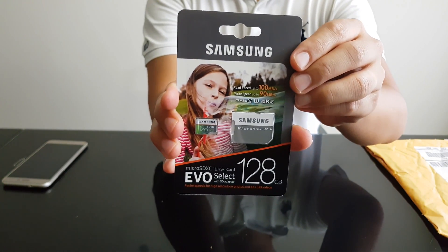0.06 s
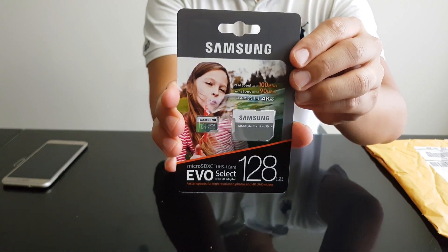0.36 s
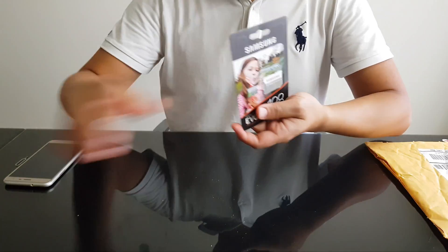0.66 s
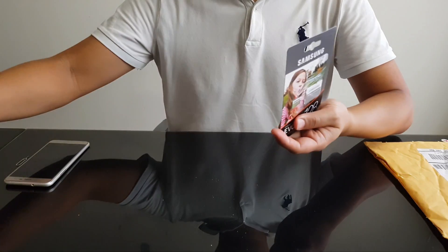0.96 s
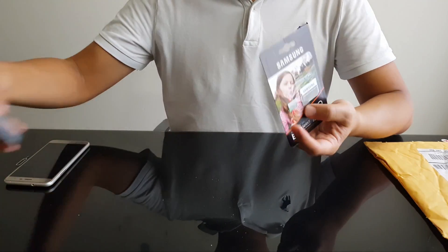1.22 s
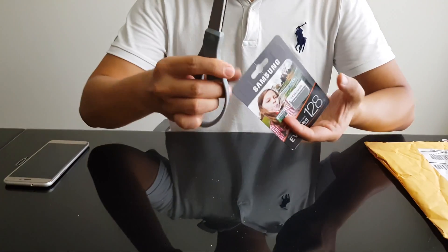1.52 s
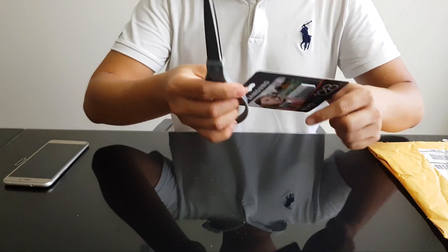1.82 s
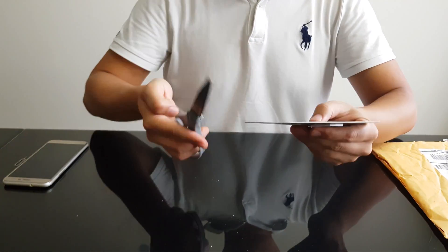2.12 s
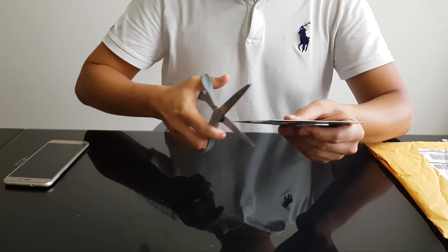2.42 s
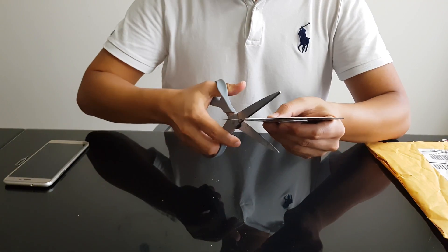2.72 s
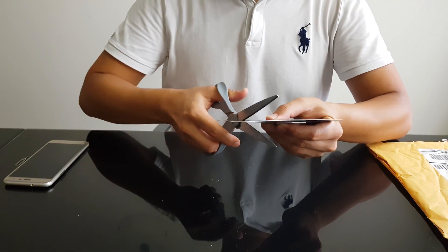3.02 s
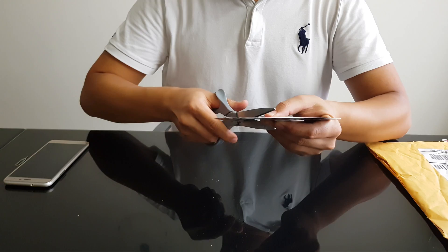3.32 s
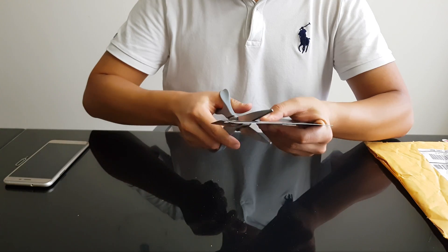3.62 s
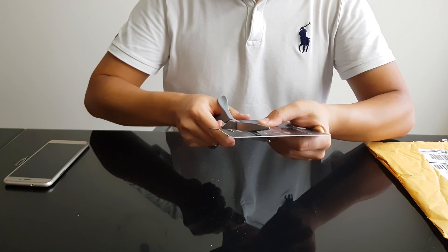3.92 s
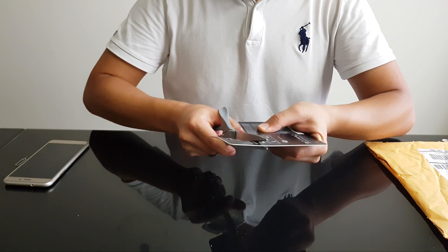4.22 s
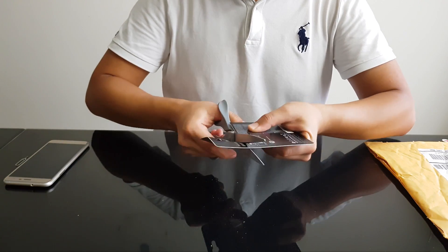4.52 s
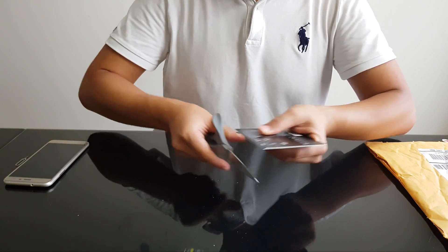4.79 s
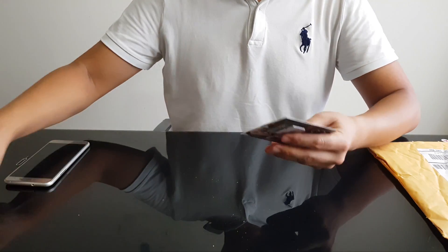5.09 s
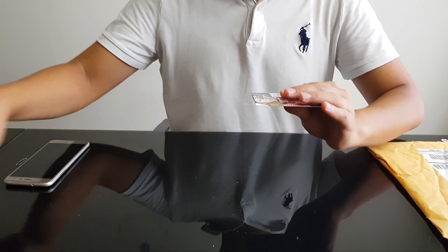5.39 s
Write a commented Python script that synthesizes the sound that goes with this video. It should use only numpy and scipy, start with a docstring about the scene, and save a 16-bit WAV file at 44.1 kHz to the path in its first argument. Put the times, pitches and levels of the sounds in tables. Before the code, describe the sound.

Scissors are lifted from a glass table, cut through a plastic blister pack with creaks and a snap, then clatter back down.

```python
"""Scissors are lifted from a glass table, whose modes ring from the knocks. A card-backed plastic blister
pack rubs and tocks in the hands, and the blades open with a swish of sliding friction. One long squeeze
drives them through the pack: it creaks by stick and slip, cracks, and yields with a snap. The pack
crackles as the blades are drawn free, and the scissors clatter back onto the glass. Throughout, a small,
bare room reverberates and rumbles, heard from a phone at the table's edge."""
import sys
import numpy as np
from scipy import signal
from scipy.fft import rfft, irfft, next_fast_len
from scipy.io import wavfile
from scipy.ndimage import uniform_filter1d

SR = 44100
rng = np.random.default_rng(int(sys.argv[2]) if len(sys.argv) > 2 else 0)


def unload_audio(sound):
    """Save the sound as a 16-bit wav file, at the path given as the first command line argument."""
    columns = np.transpose(np.atleast_2d(sound))
    # keep every value between -1 and 1, then stretch to whole-number steps
    steps = np.round(np.clip(columns, -1, 1) * 32767)
    wavfile.write(sys.argv[1], SR, steps.astype(np.int16))


N = 244755
TIME = np.arange(N) / SR

# Levels are relative within each source, and each source scales its contact times by its own stretch.
# effort of the squeeze that drives the blades through the pack: time_s, level_db
SQUEEZE_EFFORT = [(3.08, -87), (3.18, -63), (3.24, -66.5), (3.29, -64.5), (3.34, -65), (3.43, -59.5),
                  (3.6, -67), (3.75, -61), (3.8, -70), (3.87, -58.5), (4.05, -67.5), (4.2, -65)]
# card creaking where the blades wedge it: start_s, length_s, level_db
CARD_CREAKS = [(3.265, 0.036, -67.5), (3.385, 0.14, -72.5), (3.72, 0.032, -59.5)]
# resonances of the card and of the cutting edge: centre_hz, width_hz, gain_db
CARD_RESONANCES = [(810, 134, -1.5), (1860, 420, 2), (2200, 35, -16)]
EDGE_RESONANCES = [(4760, 1100, -2.5), (8500, 600, -1), (10500, 1600, -5)]

# impacts: start_s, contact_s, level_db, hardness_db
PLASTIC_CRACKS = [(3.364, 0.0037, -63, 5.5), (3.398, 0.0016, -63, 8), (3.443, 0.0025, -67, 6),
                  (3.5, 0.0021, -58, 10), (3.536, 0.005, -57, -0.5), (3.636, 0.0027, -53.5, 5.5),
                  (3.6483, 0.00099, -37.5, -8), (3.82, 0.0028, -58.5, -0.5), (3.835, 0.0017, -60, -9),
                  (3.875, 0.0019, -53, 7), (3.926, 0.0022, -52.5, 6), (3.955, 0.0038, -57.5, 5),
                  (4.0, 0.0017, -49, 3.5), (4.078, 0.0029, -58.5, 6.5), (4.129, 0.0022, -50, 1.5),
                  (4.358, 0.0082, -51, 2)]  # plastic breaking between the blades
BLADE_SNAP = [(4.3965, 0.0021, -18.5, -3.5)]  # the blades coming through and shutting
GLASS_KNOCKS = [(0.903, 0.0016, -26, 11), (0.914, 0.0067, -32, -8.5), (0.925, 0.0028, -40.5, -10.5),
                (0.941, 0.0029, -42.5, -18.5), (1.0205, 0.0077, -28, 3), (1.106, 0.0031, -39, 2.5),
                (1.143, 0.0035, -42, -3.5), (5.186, 0.0024, -38.5, 7), (5.1905, 0.0034, -23, 10.5),
                (5.204, 0.0035, -31, -9.5), (5.32, 0.0013, -26, 5), (5.326, 0.022, -33.5, -5.5),
                (5.338, 0.0012, -14, 3.5), (5.351, 0.0014, -34.5, -12.5), (5.378, 0.0012, -32, -3.5)]  # steel striking the table
PACK_TAPS = [(0.518, 0.0053, -63.5, -7), (0.855, 0.004, -71, 0), (1.3, 0.0035, -63, 5.5),
             (1.321, 0.0017, -62, 13.5), (1.42, 0.0014, -75.5, -16), (1.608, 0.0021, -63, -5.5),
             (1.623, 0.0015, -55, -6), (1.634, 0.0012, -54.5, -2), (1.832, 0.0044, -60, 2),
             (2.036, 0.0021, -63, 6.5), (4.677, 0.0019, -54.5, 6.5), (4.687, 0.0014, -56, -7.5),
             (4.697, 0.003, -51, 4.5), (4.7255, 0.0012, -38, 5), (4.746, 0.001, -47, 8),
             (4.804, 0.002, -48.5, -14.5), (4.8255, 0.0026, -40, -2.5), (4.8915, 0.001, -47.5, 8)]  # taps and crinkles in the hands
# spectral envelope of each kind of impact: frequency_hz, gain_db
CRACK_SPECTRUM = [(50, -24.5), (150, -8.5), (330, -4.5), (540, -3.5), (720, 4.5), (1050, -5), (1450, -9.5),
                  (1900, -2), (2350, 8), (3000, 4), (4400, 0.5), (6500, -6.5), (9600, 5), (15500, -14.5)]
SNAP_SPECTRUM = [(100, -28), (330, 2.5), (560, 1.5), (730, 1), (1200, 4), (1500, -6.5), (1850, 2),
                 (2350, -6), (3000, 1), (4500, -9), (6700, -15), (9000, -5), (15500, -17)]
KNOCK_SPECTRUM = [(50, 4), (110, -4.5), (165, 9.5), (350, -2.5), (800, -7), (1300, -1.5), (1650, -2.5),
                  (2200, 9.5), (4300, 9), (6000, 2.5), (8700, 7), (11500, 1.5), (15500, -13)]
TAP_SPECTRUM = [(50, -26.5), (150, -3), (330, 1), (520, 9.5), (740, 9.5), (1050, 1.5), (1450, 4),
                (2000, 0.5), (3000, 0.5), (4300, 0.5), (6500, -7), (9200, 2.5), (11500, -4.5), (15500, -13)]
# band weights of each kind of impact: bass_db, mid_db, presence_db, treble_db
CRACK_BANDS = (-30, 3.3, -1.5, -0.3)
SNAP_BANDS = (-17.5, -2, -1, -3.5)
KNOCK_BANDS = (-17, -4, 1, -11.5)
TAP_BANDS = (-7.5, -0.25, 0.5, -2.1)
# limits of those four bands: edge_hz
IMPACT_BAND_EDGES = [45, 400, 1600, 5500, 16000]
# share of hardness_db that each band gains: bass_share, mid_share, presence_share, treble_share
HARDNESS_TILT = (-1, -0.6, 0, 1)

# normal modes of table and scissors: pitch_hz, level_db, t60_s
GLASS_STEEL_MODES = [(161.6, 7.5, 0.35), (195, 7.5, 0.36), (285.5, 14.5, 0.26), (468, 10.5, 0.24),
                     (481.8, 16, 0.13), (670.2, 12.5, 0.25), (970, 4.5, 0.2), (1107, 1, 0.17),
                     (1134, 13.5, 0.11), (1400, 15.5, 0.11), (1970, 14.5, 0.13), (2180, 5, 0.24),
                     (2327, 15, 0.32), (2645, 11, 0.23), (2937, 13.5, 0.16), (3050, 13, 0.39),
                     (3140, 10, 0.23), (3650, 3.5, .24), (4170, 14, .22), (4690, 12, 0.14),
                     (4800, 16.5, 0.12), (4840, 8, .16)]
# blade sliding on blade, on opening and on being drawn free: start_s, level_db, fade_s
BLADE_SWISHES = [(2.386, -47, 0.018), (4.728, -59, 0.016)]
# resonances of the sliding blades: centre_hz, width_hz, gain_db
BLADE_RESONANCES = [(3060, 530, -8), (4730, 980, -5), (6250, 900, 1.5), (8200, 1200, -4.5),
                    (10500, 1600, -1), (13600, 1300, -16.5)]
# fingers and blades sliding over the pack: start_s, length_s, level_db
RUB_STROKES = [(0.53, 0.09, -77), (0.64, 0.027, -58), (1.2, 0.038, -57.5), (1.285, 0.044, -57.5),
               (1.37, 0.068, -67.5), (1.715, 0.053, -58.5), (1.83, 0.085, -72.5), (1.955, 0.085, -60.5),
               (2.17, 0.051, -70), (2.43, 0.034, -62.5), (4.21, 0.11, -59.5), (4.46, 0.12, -66.5),
               (4.585, 0.11, -59.5), (4.69, 0.12, -55), (4.93, 0.11, -68.5)]
# spectral envelope of that sliding: frequency_hz, gain_db
RUB_SPECTRUM = [(200, -23.5), (700, -15), (1700, -10.5), (2600, -5.5), (4100, -1), (6500, -6.5),
                (8700, 1.5), (11500, -1.5), (15500, -16)]
# the hollow pack sounding as the fingers turn it: start_s, pitch_hz, level_db, t60_s
PACK_TOCKS = [(0.52, 492, -52, 0.035), (1.301, 1760, -56, 0.019), (1.422, 1710, -64.5, 0.039),
              (1.626, 567, -57.5, 0.052), (1.832, 483, -57, 0.027), (2.018, 172, -51.5, 0.022)]
# reverberation time of the room: frequency_hz, t60_s
ROOM_DECAY = [(150, 0.37), (600, 0.19), (2500, 0.26), (6000, 0.23), (14000, 0.2)]
# spectral envelope of the background noise: frequency_hz, gain_db
ROOM_SPECTRUM = [(15, -44), (25, -9.5), (82, -5), (152, -10.5), (215, -13), (253, -21), (305, -19),
                 (389, -30), (457, -27), (762, -33), (1050, -34.5), (1380, -33.5), (2300, -35),
                 (9050, -39.5), (15500, -33.5)]


def cutting(creak_db, groan_db, crackle_db):
    """Forced resonance: stick-slip friction drives card and cutting edge, louder with greater effort."""
    slips = friction(slip_hz=230, uneven_db=4.8, grain_db=7, spread=0.7)
    times, effort_db = np.transpose(SQUEEZE_EFFORT)
    effort = undb(np.interp(TIME, times, effort_db, left=-140, right=-140))
    card = unit(band(resonate(slips, CARD_RESONANCES), 450, 2800))
    edge = unit(band(resonate(slips, EDGE_RESONANCES), 3000, 13000))
    creak = card * (undb(groan_db) * effort + undb(creak_db) * strokes(CARD_CREAKS))
    return creak + undb(crackle_db) * edge * effort


def fracture():
    """Release of elastic energy: the plastic gives way in cracks until the blades snap shut."""
    cracks = impacts(PLASTIC_CRACKS, CRACK_SPECTRUM, CRACK_BANDS,
                     pan_db=-2.2, spread=0.35, grain_db=1, stretch=0.95)
    snap = impacts(BLADE_SNAP, SNAP_SPECTRUM, SNAP_BANDS,
                   pan_db=-1.5, spread=0.23, grain_db=1, stretch=0.83)
    return cracks + snap


def clatter():
    """Impact of hard bodies: brief contacts of steel on glass radiate broadband clicks."""
    return impacts(GLASS_KNOCKS, KNOCK_SPECTRUM, KNOCK_BANDS,
                   pan_db=-0.5, spread=0.92, grain_db=2, stretch=1.005)


def table_ring(knocks, ring_db, rattle_db, rattle_t60_s):
    """Free vibration: glass and steel ring in damped modes while the loose blades chatter at the pivot."""
    t = np.arange(SR // 2) / SR
    ring = 0
    for hz, db, t60 in GLASS_STEEL_MODES:
        decay = np.log(1000) / t60
        shortness = min(hz / 3000, 1)
        # short waves reach each side in a different phase; shifting contacts blur the high modes
        phase = 2 * np.pi * shortness * (rng.random((2, 1)) - 1 / 2)
        waver = shortness * np.cumsum(rng.standard_normal(len(t))) * np.sqrt(decay / SR / 2)
        envelope = undb(db) * 2 * decay / SR * np.exp(-decay * t)
        ring = ring + envelope * np.cos(2 * np.pi * hz * t + phase + waver)
    chatter = grit(len(t), grain_db=3, spread=1) * np.exp(-np.log(1000) * t / rattle_t60_s)
    chatter = band(unit(chatter) / np.sqrt(len(t)), 1800, 4500, order=2)
    return convolve(knocks, undb(ring_db) * ring + undb(rattle_db) * chatter)


def blades_slide(rise_s):
    """Sliding friction: one blade scrapes the other and excites its resonances in a thin, bright swish."""
    contacts = grit(N, grain_db=3, spread=1)
    scrape = unit(band(resonate(contacts, BLADE_RESONANCES), 2500, 16000))
    gain = 0
    for start, db, fade_s in BLADE_SWISHES:
        age = np.maximum(TIME - start, 0)
        gain = gain + undb(db) * (1 - np.exp(-age / rise_s)) * np.exp(-age / fade_s)
    return scrape * gain


def handling(rub_db, tap_db, tock_db):
    """Friction and flexure: skin and steel rub the pack; its stiff shell ticks and rings in damped tocks."""
    slips = friction(slip_hz=200, uneven_db=2.5, grain_db=5, spread=0.8)
    rub = unit(colour(slips, RUB_SPECTRUM)) * strokes(RUB_STROKES)
    taps = impacts(PACK_TAPS, TAP_SPECTRUM, TAP_BANDS,
                   pan_db=-2.4, spread=0.44, grain_db=5.5, stretch=0.93)
    tocks = 0
    for start, hz, db, t60 in PACK_TOCKS:
        age = np.maximum(TIME - start, 0)
        tocks = tocks + undb(db) * np.sin(2 * np.pi * hz * age) * np.exp(-np.log(1000) * age / t60)
    return undb(rub_db) * rub + undb(tap_db) * taps + undb(tock_db) * tocks


def impacts(table, spectrum, bands_db, pan_db, spread, grain_db, stretch):
    """Impulsive excitation: each blow is a burst of micro-contacts; a harder one trades bass for treble."""
    size = 4096
    t = np.arange(size) / SR
    out = np.zeros((2, N + size))
    for start, contact_s, level_db, hardness_db in table:
        age = t / max(contact_s * stretch, 1e-4)
        burst = grit(size, grain_db, spread) * age * np.exp(-age)
        force = colour(whiten(burst), spectrum)
        first = int(start * SR)
        levels = level_db + np.array(bands_db) + hardness_db * np.array(HARDNESS_TILT)
        for db, lo, hi in zip(levels, IMPACT_BAND_EDGES, IMPACT_BAND_EDGES[1:]):
            part = band(force, lo, hi)
            power = uniform_filter1d(np.mean(part ** 2, axis=0), size=150, mode="constant")
            shadow_db = pan_db * min(hi / 1600, 1)  # the sides differ less in the bass
            gains = undb(db + np.array([[shadow_db], [-shadow_db]]) / 2)
            out[:, first:first + size] += gains * part / np.sqrt(power.max())
    return out[:, :N]


def friction(slip_hz, uneven_db, grain_db, spread):
    """Stick-slip motion: contact noise jumps in strength at random slips, at a mean rate of slip_hz."""
    slip_index = np.cumsum(rng.random(N) < slip_hz / SR)
    return grit(N, grain_db, spread) * undb(uneven_db * rng.standard_normal(N)[slip_index])


def grit(size, grain_db, spread):
    """Surface roughness: tiny unequal contacts sum to noise; above the bass the sides differ by spread."""
    mid, side, grain_sizes = rng.standard_normal((3, size))
    side = spread * band(side, 700, 20000, order=2)
    return stereo(mid, side) * undb(grain_db * np.tanh(grain_sizes))


def strokes(table, attack_s=0.048, release_s=0.0083):
    """Amplitude envelope of sliding: each stroke grows as it gathers speed, then dies exponentially."""
    gain = 0
    for start, length, db in table:
        rise = np.clip((TIME - start) / attack_s, 0, 1)
        fall = np.exp(-np.maximum(TIME - start - length, 0) / release_s)
        gain = np.maximum(gain, undb(db) * rise * fall)
    return gain


def reverberation(x, wet_db, build_s, shared_hz):
    """Diffuse field: reflections from table and walls build and decay; long waves reach both sides alike."""
    t = np.arange(SR // 2) / SR
    freqs = np.fft.rfftfreq(len(t), 1 / SR)
    mid, side = np.exp(2j * np.pi * rng.random((2, len(freqs))))
    width = freqs / np.hypot(freqs, shared_hz)
    field = stereo(mid, width * side) / np.sqrt(1 + width ** 2)
    build = 1 - np.exp(-(t / build_s) ** 2)
    octaves_hz = 80 * 2. ** np.arange(9)
    response = 0
    for lo, hi in zip(octaves_hz, octaves_hz[1:]):
        t60 = on_log_axis(np.sqrt(lo * hi), ROOM_DECAY)
        reflections = irfft(field * ((freqs >= lo) & (freqs < hi)), len(t))
        response = response + reflections * unit(build * np.exp(-np.log(1000) * t / t60))
    return undb(wet_db) * convolve(x, response)


def room_tone(level_db, bass_side_db):
    """Ambient noise: a low rumble, largely coherent between the sides, under a faint, incoherent hiss."""
    mid, side = colour(rng.standard_normal((2, N)), ROOM_SPECTRUM)
    side = colour(side, [(200, bass_side_db), (600, -1.0), (2000, 0.5)])
    return undb(level_db) * stereo(mid, side) / np.std(mid)


def whiten(burst):
    """Spectral whitening: the broad slope is levelled; narrow peaks stay and colour each contact."""
    power = uniform_filter1d(np.mean(np.abs(rfft(burst)) ** 2, axis=0), size=70)
    freqs = np.fft.rfftfreq(burst.shape[-1], 1 / SR)
    return colour(burst, np.transpose([freqs, -10 * np.log10(power)])[1:])


def colour(x, points):
    """Minimum-phase filtering through (frequency_hz, gain_db) points, by folding the cepstrum."""
    size = 2 * next_fast_len(x.shape[-1])
    gain = undb(on_log_axis(np.fft.rfftfreq(size, 1 / SR), points))
    cepstrum = irfft(np.log(gain))
    cepstrum[1:size // 2] *= 2
    cepstrum[size // 2 + 1:] = 0
    return irfft(rfft(x, size) * np.exp(rfft(cepstrum)))[..., :x.shape[-1]]


def resonate(x, peaks):
    """Parallel resonators: their responses to one drive add."""
    return sum(undb(db) * signal.lfilter(*signal.iirpeak(hz, hz / width, fs=SR), x)
               for hz, width, db in peaks)


def band(x, lo_hz, hi_hz, order=3):
    """Band-pass filtering."""
    return signal.sosfilt(signal.butter(order, [lo_hz, hi_hz], "band", fs=SR, output="sos"), x)


def convolve(x, response):
    """Convolution with a linear system's impulse response."""
    return signal.fftconvolve(x, response, axes=-1)[:, :N]


def on_log_axis(hz, points):
    """Interpolation over logarithmic frequency."""
    freqs, values = np.transpose(points)
    return np.interp(np.log(np.maximum(hz, 1)), np.log(freqs), values)


def stereo(mid, side):
    """Sum and difference give left and right."""
    return mid + np.array([[1], [-1]]) * side


def unit(x):
    """Normalisation to rms 1."""
    return x / np.sqrt(np.mean(x ** 2))


def undb(db):
    """Decibels to amplitude ratio."""
    return 10 ** (np.asarray(db) / 20)


def scene():
    """Superposition: direct sounds, their reflections, the table's ring and the ambient noise add."""
    knocks = undb(-2) * clatter()
    ring = table_ring(knocks, ring_db=-5, rattle_db=-1, rattle_t60_s=0.13)
    cut = cutting(creak_db=0.5, groan_db=-15.5, crackle_db=-4.5) + undb(-5) * fracture()
    swish = blades_slide(rise_s=0.0013)
    pack = handling(rub_db=-1.5, tap_db=-1.5, tock_db=4)
    incident = knocks + undb(-1.5) * cut + swish + pack
    walls = reverberation(incident, wet_db=-3.5, build_s=0.0025, shared_hz=925)
    return cut + knocks + ring + swish + pack + walls + room_tone(level_db=-68.8, bass_side_db=-10)


def record(dry):
    """Attenuation and band limiting: the level dips briefly early on; the phone cuts the highest treble."""
    dip_start_s, dip_end_s, dip_db, cutoff_hz = 0.412, 0.512, -21, 15900
    in_dip = (TIME > dip_start_s) & (TIME < dip_end_s)
    gain = uniform_filter1d(np.where(in_dip, undb(dip_db), 1.), size=400)
    low_pass = signal.ellip(8, 0.2, 70, cutoff_hz, fs=SR, output="sos")
    return signal.sosfilt(low_pass, dry * gain)


dry = scene()
out = record(dry)
unload_audio(out)
```